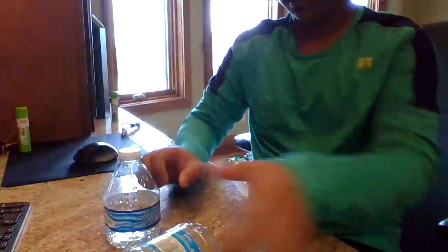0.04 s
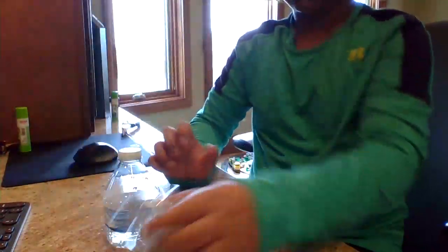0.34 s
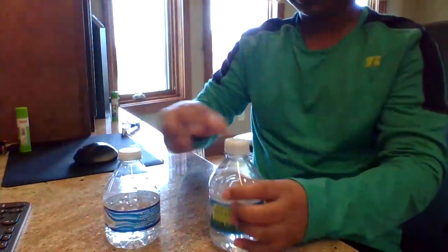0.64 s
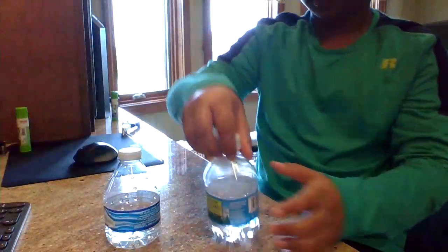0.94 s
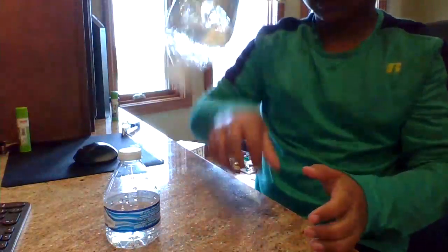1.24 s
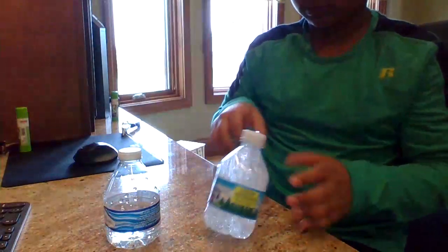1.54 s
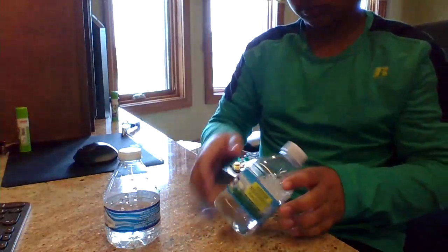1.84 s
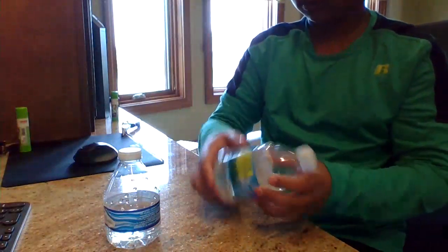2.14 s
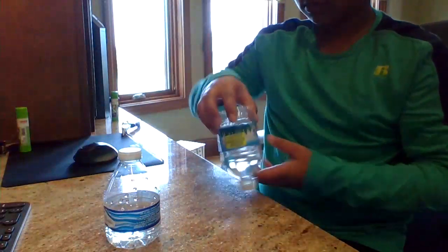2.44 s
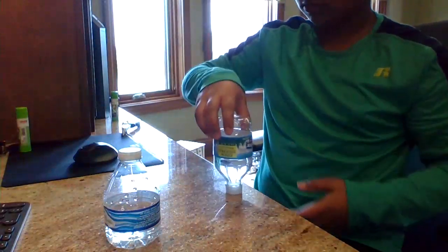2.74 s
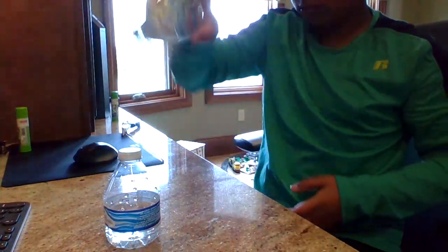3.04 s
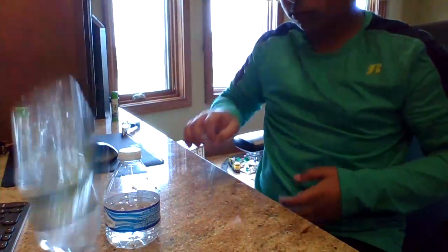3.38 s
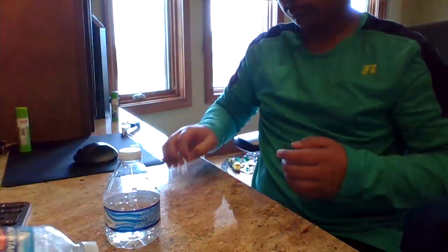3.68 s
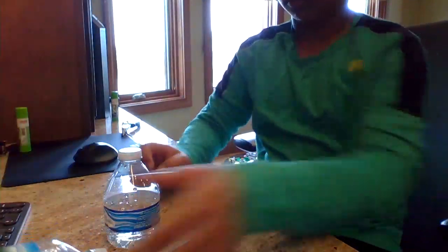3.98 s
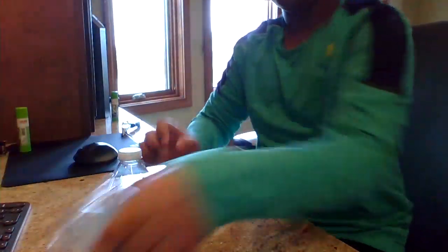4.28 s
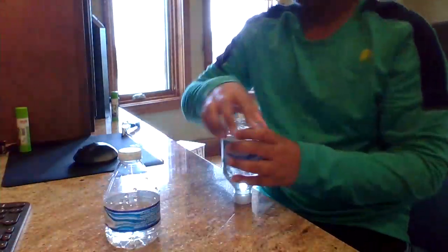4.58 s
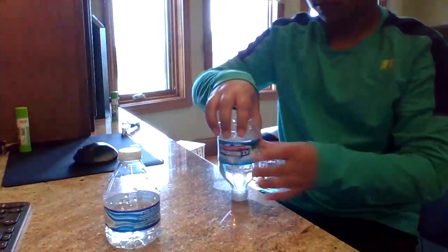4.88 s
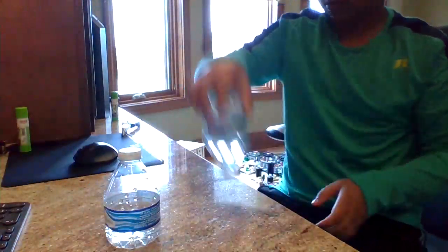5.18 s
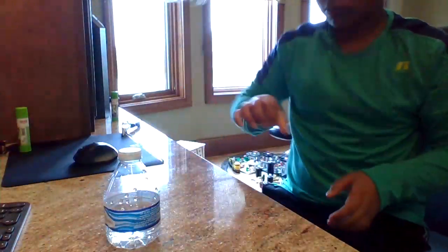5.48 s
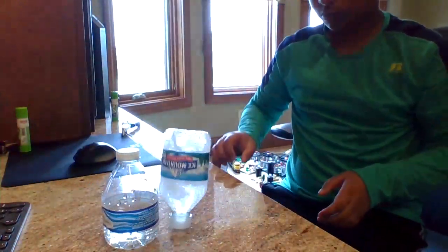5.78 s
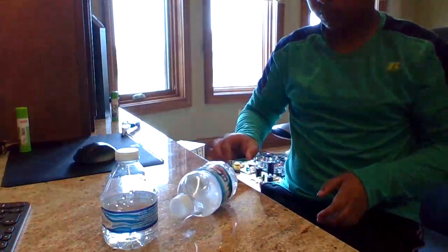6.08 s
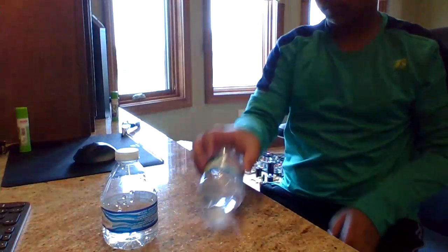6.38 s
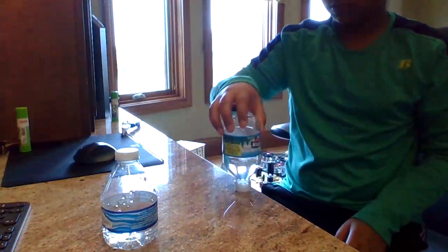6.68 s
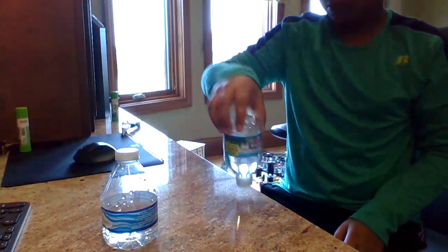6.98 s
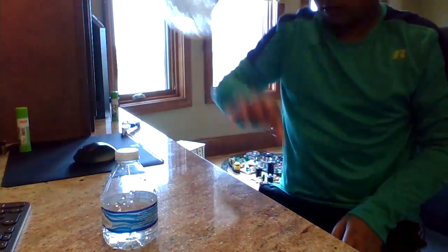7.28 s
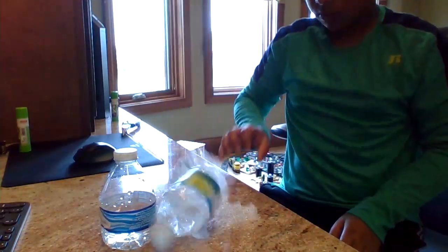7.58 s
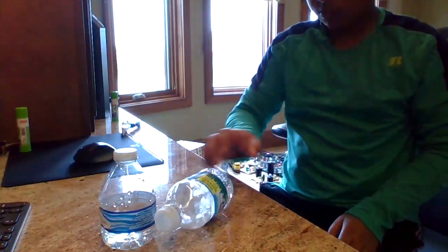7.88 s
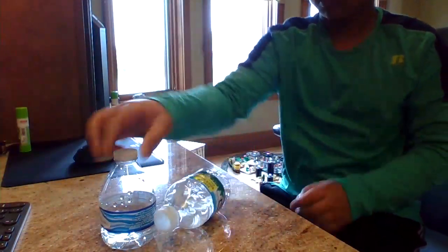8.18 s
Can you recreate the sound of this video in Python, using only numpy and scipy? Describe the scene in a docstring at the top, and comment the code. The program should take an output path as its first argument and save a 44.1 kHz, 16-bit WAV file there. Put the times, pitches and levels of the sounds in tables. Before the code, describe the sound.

Thin plastic water bottles hit a stone kitchen counter again and again, cracking and thudding, with glugs and crinkles between throws.

```python
"""Water sloshes and thin plastic crinkles as part-filled bottles are handled in a quiet, live kitchen.
Flipped, they land on a stone countertop close to the microphones. Each landing is a crack of the
buckling shell, a hollow note from the water's weight and a thud of the counter; air pockets then glug
as the water settles. The hardest landings overload the input."""
import sys
import numpy as np
from scipy import signal
from scipy.fft import rfft, irfft
from scipy.io import wavfile

SR = 44100
rng = np.random.default_rng(int(sys.argv[2]) if len(sys.argv) > 2 else 0)


def inscribe(sig):
    """Save sig as 16-bit PCM at rate SR to the path in sys.argv[1].

    A 1-D sig is mono; a 2-D sig holds one channel per row.
    Samples are clipped to [-1, 1] before scaling.
    """
    pcm = np.round(np.clip(np.atleast_2d(sig).T, -1, 1) * 32767)
    wavfile.write(sys.argv[1], SR, pcm.astype(np.int16))


N = 362943


def amp(db):
    """Decibels to gain."""
    return 10 ** (np.asarray(db) / 20)


def unit_rms(x):
    """Scales to rms 1."""
    return x / np.sqrt(np.mean(x ** 2) + 1e-20)


def lookup(rows, hz, column=1):
    """Interpolates a table column over log frequency."""
    table = np.transpose(rows)
    return np.interp(np.log(hz + 1), np.log(table[0] + 1), table[column])


def add(mix, start_s, sound):
    """Mixes a mono or stereo sound into both channels."""
    part = mix[:, max(round(start_s * SR), 0):][:, :sound.shape[-1]]
    part += sound[..., :part.shape[1]]


def colour(x, spectrum):
    """Filters x by a spectrum table, to rms 1."""
    size = x.shape[-1]
    gain = amp(lookup(spectrum, np.fft.rfftfreq(size, 1 / SR)))
    return unit_rms(irfft(rfft(x) * gain, size))


def band_noise(size, hz, octaves, order=1):
    """Noise in a resonance round hz; a higher order has steeper skirts."""
    detune = np.log2((np.fft.rfftfreq(size, 1 / SR) + 1) / hz) / octaves
    return unit_rms(irfft(rfft(rng.standard_normal(size)) / (1 + detune ** 2) ** order, size))


def swell(spread_s):
    """Gaussian envelope, 1 s long, peaking at 0.5 s."""
    return np.exp(-.5 * ((np.arange(SR) / SR - .5) / spread_s) ** 2)


# Diffuse field. Each row: frequency in Hz, correlation between the microphones.
COHERENCE = [(100, 0.68), (700, 0.79), (1400, 0.53), (2800, 0.11)]


def diffuse_noise(size):
    """Diffuse noise at two close microphones: alike in the bass."""
    common, opposed = rfft(rng.standard_normal((2, size)))
    angle = np.arccos(lookup(COHERENCE, np.fft.rfftfreq(size, 1 / SR))) / 2
    mid, side = common * np.cos(angle), opposed * np.sin(angle)
    return irfft(np.array([mid + side, mid - side]), size)


# Room hush. Each row: frequency in Hz, relative density in dB.
HUSH_SPECTRUM = [(12, -61.5), (20, -4.5), (86, 0.5), (204, -10), (480, -21), (8410, -28), (16000, -25.5)]


def room_tone(hush_db=-52, hum_db=-73, hum_hz=252):
    """A low hush and a faint steady hum."""
    hush = amp(hush_db) * colour(diffuse_noise(N), HUSH_SPECTRUM)
    return hush + amp(hum_db) * band_noise(N, hum_hz, octaves=.005)


# Narrow room resonance. Each row: frequency in Hz, impulse response level in dB, T60 in seconds.
ROOM_MODES = [(251.05, -76.5, 1.29)]


def room_resonance(x):
    """The room hums on after each blow."""
    t = np.arange(2 * SR) / SR
    response = sum(amp(db - 60 * t / t60_s) * np.sin(2 * np.pi * hz * t) for hz, db, t60_s in ROOM_MODES)
    return signal.fftconvolve(x, response)[:N]


# Kitchen reverb. Each row: frequency in Hz, level in dB, early and late T60 in seconds.
REVERB_BANDS = [(80, -13, 0.71, 2.3), (270, -16, 0.46, 1.2), (523, -6, 0.31, 1.19), (1200, -5.5, 0.38, 1.2),
                (2880, -7.5, 0.48, 0.69), (7060, -10, 0.42, 0.81), (12000, -9, 0.24, 0.3)]


def room_tail(late_db=-13, build_s=0.0031):
    """Near surfaces answer fast and densely; the rest of the room rings on more faintly."""
    hz, t, noise = signal.stft(diffuse_noise(SR), SR, nperseg=256)
    level_db, early_s, late_s = (lookup(REVERB_BANDS, hz, column)[:, None] for column in (1, 2, 3))
    fade = amp(-60 * t / early_s) + amp(late_db - 60 * t / late_s)
    fade *= amp(level_db) / np.sqrt(SR * np.mean(fade ** 2, axis=1, keepdims=True))
    tail = signal.istft(noise * fade, SR, nperseg=256)[1]
    return tail * (1 - np.exp(-(np.arange(tail.shape[1]) / SR / build_s) ** 2))


def reverb(x, paths=4, split_hz=800, rotation_hz=70):
    """Treble scatters down ever-changing paths; bass always takes the same one."""
    bass = signal.sosfiltfilt(signal.butter(2, split_hz, fs=SR, output="sos"), x)
    phase = 2 * np.pi * rotation_hz * np.arange(N) / SR
    feeds = [(x - bass) * np.maximum(np.cos(phase + 2 * np.pi * k / paths), 0) for k in range(paths)]
    feeds[0] += bass
    return sum(signal.fftconvolve(feed[None], room_tail(), axes=1)[:, :N] for feed in feeds)


def direct_path(x, aside_from_s=3.4, aside_to_s=4.4, lag_s=.0001):
    """While a bottle lies to the side, its sound reaches the left microphone later."""
    t = np.arange(N) / SR
    aside = (t > aside_from_s) & (t < aside_to_s)
    delayed = np.roll(x[0], round(lag_s * SR))
    return np.array([np.where(aside, delayed, x[0]), x[1]])


# Finger slides. Each row: peak time in seconds, spread in seconds, level in dB.
FINGER_SLIDES = [(1.19, 0.01, -42.5), (4.378, 0.024, -44.5), (7.236, 0.0095, -45)]


def scrapes():
    """Plastic slides under the fingers with a soft rasp."""
    out = np.zeros((2, N))
    for peak_s, spread_s, db in FINGER_SLIDES:
        add(out, peak_s - .5, amp(db) * swell(spread_s) * band_noise(SR, hz=2200, octaves=1))
    return out


def wall_noise(size, shared=0.2):
    """Each patch of wall radiates its own way, so the microphones share only part of the noise."""
    return np.sqrt(shared) * rng.standard_normal(size) + np.sqrt(1 - shared) * diffuse_noise(size)


# Snapping crease. Each row: frequency in Hz, relative density in dB.
SNAP_SPECTRUM = [(500, -15.5), (4000, -0.5), (10000, 3), (14500, 9)]


def snap(decay_s, size=4096):
    """A crease snaps over, sharpest as it gives way."""
    t = np.arange(size) / SR
    edge = 1 + 2 * np.exp(-t / .0005)
    return colour(wall_noise(size, shared=0.48), SNAP_SPECTRUM) * np.exp(-t / decay_s) * edge


def crinkle(decay_s=0.0032, run_s=0.019, after_db=-11):
    """One crease snaps and sets off two smaller ones."""
    out = np.zeros((2, 8192))
    add(out, 0, snap(decay_s))
    for delay_s in run_s * rng.random(2):
        add(out, delay_s, amp(after_db) * snap(decay_s / 2))
    return out


def faint_crackles(move_db=-42, stray_db=-52, per_move=7, stray_count=24):
    """The shell crackles around each slosh, plus strays at random times."""
    out = np.zeros((2, N))
    moves = [(peak_s + 2 * spread_s * offset, move_db)
             for peak_s, spread_s, *_ in slosh_events() for offset in rng.uniform(-2.1, 1, per_move)]
    strays = [(start_s, stray_db) for start_s in rng.uniform(0, N / SR, stray_count)]
    for start_s, max_db in moves + strays:
        add(out, start_s, amp(max_db - 10 * abs(rng.standard_normal())) * crinkle())
    return out


# Louder crinkles. Each row: start in seconds, level in dB.
CREASES = [(0.201, -28), (0.266, -30), (0.456, -43), (0.537, -24), (0.838, -36), (1.248, -31.5),
           (1.2617, -27), (1.279, -23), (1.291, -36), (2.067, -28), (2.333, -34), (2.387, -34.5),
           (2.718, -34), (3.756, -28), (3.807, -31.5), (4.474, -41.5), (4.746, -41), (5.252, -10),
           (5.719, -12), (6.012, -24), (6.0665, -17.5), (6.079, -23), (6.513, -40), (7.26, -21.5),
           (7.334, -25.5), (7.344, -37), (7.679, -17.5)]


def creases():
    """Creases in the wall give way, bright and unpitched."""
    out = np.zeros((2, N))
    for start_s, db in CREASES:
        add(out, start_s, amp(db) * crinkle())
    return out


# Short pitched ticks. Each row: start in seconds, centre in Hz, level in dB.
PITCHED_TICKS = [(0.266, 1100, -34.5), (0.334, 1320, -25), (0.456, 4330, -29.5), (0.655, 3240, -38),
                 (0.679, 2650, -36.5), (0.837, 3180, -42.5), (1.214, 3010, -24.5), (1.279, 1790, -29.5),
                 (1.442, 1390, -36.5), (2.116, 1100, -37), (2.511, 1810, -32), (2.934, 1660, -46),
                 (4.238, 1348, -30), (4.27, 1650, -25), (4.344, 1950, -30.5), (4.491, 4800, -25),
                 (4.657, 1910, -40), (4.802, 1210, -42.5), (4.849, 950, -42), (5.135, 4070, -35),
                 (5.204, 2410, -28.5), (6.013, 2960, -18.5), (6.4315, 2170, -29.5), (6.433, 1070, -11),
                 (7.303, 3155, -27.5), (7.371, 2800, -51), (7.66, 2760, -15.5)]


def pitched_ticks(decay_s=0.003, edge_db=-12, size=4096):
    """Plastic pops and small water plinks: one broad, damped resonance and a sharp edge."""
    out = np.zeros((2, N))
    fade = np.exp(-np.arange(size) / SR / decay_s)
    for start_s, hz, db in PITCHED_TICKS:
        resonance = unit_rms(band_noise(size, hz, octaves=.42) * fade) * np.sqrt(np.mean(fade ** 2))
        add(out, start_s, amp(db) * (resonance + amp(edge_db) * snap(decay_s / 2)))
    return out


# Spray on the wall. Each row: frequency in Hz, relative density in dB.
SPRAY_SPECTRUM = [(300, -17), (1500, 0.5), (3500, 3.5), (10000, 1.5), (15000, 2.5)]


def spray(drops_per_s=400, splat_s=.0007, wash=0.93):
    """One second of drops fizzing on the thin wall in clumps."""
    hits = rng.random(SR) < drops_per_s / SR
    drops = hits * amp(4.5 * np.minimum(rng.exponential(1, SR), 3))
    splats = signal.lfilter([1], [1, -np.exp(-1 / (splat_s * SR))], drops)
    fizz = colour((splats + wash) * wall_noise(SR), SPRAY_SPECTRUM)
    clumps = amp(3 * band_noise(SR, hz=50, octaves=.6))
    return fizz * clumps


# Swells of sloshing water, as a bottle settles or is turned.
# Each row: peak time in seconds, spread in seconds, gurgle level in dB.
WATER_SWELLS = [(0.01, 0.076, -46.5), (0.539, 0.038, -42), (0.799, 0.11, -56), (2.09, 0.029, -57),
                (2.343, 0.036, -44.5), (4.522, 0.018, -36.5), (4.719, 0.16, -52.5), (6.39, 0.037, -47.5)]


def slosh_events(swell_hz=274, swell_spray_db=-1.5, flip_hz=447, flip_db=-44.5):
    """One slosh per swell and per flip; flung water gurgles higher."""
    swells = [(peak_s, spread_s, db, db + swell_spray_db, swell_hz)
              for peak_s, spread_s, db in WATER_SWELLS]
    flung = [(start_s + WATER_LAG_S, WATER_SPREAD_S, flip_db, spray_db, flip_hz)
             for start_s, _, _, spray_db, _ in WRIST_FLICKS]
    return swells + flung


def sloshes():
    """Moving water swells into a low gurgle and a fizz of spray."""
    out = np.zeros((2, N))
    for peak_s, spread_s, gurgle_db, spray_db, gurgle_hz in slosh_events():
        fizz = amp(spray_db) * spray()
        gurgle = amp(gurgle_db) * band_noise(SR, gurgle_hz, octaves=1.7, order=2)
        slosh = swell(spread_s) * (gurgle + fizz)
        skip = max(round((.5 - peak_s) * SR), 0)
        add(out, peak_s - .5, slosh[:, skip:])
    return out


def glug(hz, db, swell_cycles=1.92, rise=0.031, size=SR):
    """An air pocket swells and dies away, its pitch rising as the water closes round it."""
    age = np.arange(size) / SR * hz / swell_cycles
    phase = 2 * np.pi * np.cumsum(hz * (1 + rise * age)) / SR
    return amp(db) * age * np.exp(1 - age) * np.sin(phase)


# Larger glugs. Each row: start in seconds, pitch in Hz, level in dB.
AIR_POCKETS = [(0.526, 336, -31.5), (0.552, 110.5, -36.5), (1.5155, 221, -5), (1.565, 215, -22.5),
               (2.304, 214, -29.5), (2.35, 237, -27.5), (2.356, 730, -26.5), (2.393, 880, -36.5),
               (2.605, 325, -22.5), (4.489, 227, -29.5), (4.524, 960, -25), (4.543, 285.5, -10),
               (4.583, 295, -15.5), (5.996, 324, -22), (7.593, 240, -24), (7.616, 255, -14),
               (7.683, 225.5, -17.5)]


def air_pockets():
    """Pockets of air ring in the moving water."""
    out = np.zeros((2, N))
    for start_s, hz, db in AIR_POCKETS:
        add(out, start_s, glug(hz, db))
    return out


# Throws. Each row: start in seconds, then rattle, crack, spray and gulp levels in dB.
WRIST_FLICKS = [(1.209, -33, -32, -59, -45), (3.117, -27, -19, -35.5, -28.5),
                (5.362, -16.5, 2.5, -32.5, -29.5), (7.256, -41, -34, -35.5, -38)]
WATER_LAG_S, WATER_SPREAD_S = 0.04, 0.034


def flips(neck_hz=390, belly_hz=225, belly_db=-38, decay_s=0.0086):
    """The flick crushes the shell and sets off a high gulp; a lower one comes as the water swings over."""
    out = np.zeros((2, N))
    for start_s, rattle_db, crack_db, _, gulp_db in WRIST_FLICKS:
        add(out, start_s, shell_crush(rattle_db, crack_db, decay_s, SNAP_SPECTRUM))
        add(out, start_s, glug(neck_hz, gulp_db, swell_cycles=4, rise=0))
        add(out, start_s + WATER_LAG_S, glug(belly_hz, belly_db, swell_cycles=4))
    return out


def droplets(centre_hz=3600, below_spray_db=3, count=10):
    """After each flip, drops plink back into the water."""
    out = np.zeros((2, N))
    for flip_s, _, _, spray_db, _ in WRIST_FLICKS:
        for jitter, pitch, faintness in rng.standard_normal((count, 3)):
            start_s = flip_s + 2 * WATER_LAG_S + WATER_SPREAD_S * jitter
            hz = centre_hz * 2 ** (pitch / 2)
            db = spray_db - below_spray_db - 10 * abs(faintness)
            add(out, start_s, glug(hz, db, swell_cycles=4, size=2048))
    return out


def churn(centre_hz=235, below_blow_db=9, max_db=-30, fade_db=-16, lag_s=0.0151, span_s=0.096, count=18):
    """After each knock the water churns to rest in a crowd of glugs that fade and fall in pitch."""
    out = np.zeros((2, N))
    for start_s, blow_db, *_ in BOTTLE_KNOCKS:
        for k, (jitter, pitch) in enumerate(rng.random((count, 2))):
            progress = (k + jitter) / count
            hz = centre_hz * 2 ** (2 * (pitch - .5) - progress / 2)
            db = min(blow_db - below_blow_db, max_db) + fade_db * progress
            add(out, start_s + lag_s + span_s * progress, glug(hz, db, rise=0, size=8192))
    return out


# Knocks that set the bottle ringing. Each row: start in seconds, centre in Hz, level in dB.
RINGING_KNOCKS = [(3.467, 560.2, -6), (5.7075, 553, -6), (6.432, 1152, -22.5)]


def bottle_rings(t60_s=0.32, octaves=0.23, count=9):
    """The bottle rings in a cluster of uneven modes, strongest in the middle, that beat as they fade."""
    out = np.zeros((2, N))
    t = np.arange(SR) / SR
    for start_s, centre_hz, db in RINGING_KNOCKS:
        cluster = np.zeros(SR)
        for offset in 2 * (np.arange(count) + rng.random(count)) / count - 1:
            hz = centre_hz * 2 ** (octaves * offset)
            cluster += (1 - abs(offset) / 2) * np.sin(2 * np.pi * (hz * t + rng.random()))
        add(out, start_s, amp(db - 60 * t / t60_s) * cluster / np.sqrt(count))
    return out


# Counter and surroundings. Each row: mode frequency in Hz, relative level in dB, T60 in seconds.
COUNTER_MODES = [(78.5, -11, 0.24), (102.8, -5, 0.36), (141.7, -15.5, 0.74), (227, -0.5, 0.11),
                 (244.4, -5, 0.12), (313, -8, 0.37), (347.6, -3, 0.34), (423, -12, 0.4), (485.6, -12, 0.35),
                 (553, -9.5, 0.18), (886, -16.5, 0.11)]


def counter_thud(db, tilt_db_per_octave, contact_s=0.00035, damping=0.76, settle_s=0.04):
    """The counter rings; the settling water soaks up part of the ring."""
    t = np.arange(SR) / SR
    ring = np.zeros(SR)
    for k, (hz, mode_db, t60_s) in enumerate(COUNTER_MODES):
        fade = amp(mode_db + tilt_db_per_octave * np.log2(hz / 240) - 60 * t / t60_s)
        ring += (-1) ** k * fade * np.sin(2 * np.pi * hz * t)
    attack = 1 - np.exp(-t / contact_s)
    settling = 1 + damping * (2 * np.exp(-t / settle_s) - 1)
    return amp(db) * ring * attack * settling


# Shell rattle. Each row: frequency in Hz, relative density in dB.
RATTLE_SPECTRUM = [(100, -7), (300, -5.5), (800, 1), (2500, -8), (5000, -14), (9000, -25.5)]


def shell_crush(rattle_db, crack_db, decay_s, crack_spectrum, size=16384):
    """Thin plastic crushes in a quick run of buckles: a rattle and a shorter, brighter crack."""
    t = np.arange(size) / SR
    buckles = unit_rms(amp(4.5 * band_noise(size, hz=220, octaves=.7)))
    rattle = colour(wall_noise(size), RATTLE_SPECTRUM) * np.exp(-t / decay_s)
    crack = colour(wall_noise(size), crack_spectrum) * np.exp(-t / (0.81 * decay_s))
    attack = 1 - np.exp(-t / (0.15 * decay_s))
    return (amp(rattle_db) * rattle + amp(crack_db) * crack) * buckles * attack


# Crack of a knock. Each row: frequency in Hz, relative density in dB.
CRACK_SPECTRUM = [(300, -36.5), (2000, -11), (5000, -1), (9000, -2.5), (14000, -2.5)]
# Response to a blow's weight. Each row: blow in dB, thud tilt in dB per octave, rattle decay in seconds.
BLOW_RESPONSE = [(-29, 0.5, 0.0082), (-14.5, -6, 0.014), (-4.5, 3, 0.014)]
# Bottle knocks: landings, and one hollow pop as it is picked up.
# Each row: start in seconds, blow in dB, note in Hz, rattle in dB, crack in dB.
BOTTLE_KNOCKS = [(0.864, -49, 98.5, -38.5, -57), (1.507, -16, 214, -1.5, 1.5),
                 (2.5942, -18.5, 344.4, -25, -27), (3.468, -7.5, 212.5, -2.5, 4),
                 (3.657, -28, 215, -16.5, -24), (3.667, -33.5, 236, -19.5, -8.5),
                 (4.543, -21, 300, -23, -29.5), (5.7066, -6, 206.6, 1.5, 2.5),
                 (5.993, -25.5, 349, -12, -19), (6.0676, -42, 341.4, -18.5, -22.5),
                 (6.432, -29.5, 444, -21, -42), (6.645, -27.5, 112.2, -30.5, -38),
                 (7.576, -5.5, 228.7, 1, -1), (7.661, -24, 220, -15, -31)]


def knocks(note_over_blow_db=4, tick_below_crack_db=7):
    """Each knock is a thud, a swelling hollow note, and a crush and tick of the wall."""
    out = np.zeros((2, N))
    blows_db, tilts, decays_s = np.transpose(BLOW_RESPONSE)
    for start_s, blow_db, note_hz, rattle_db, crack_db in BOTTLE_KNOCKS:
        tilt = np.interp(blow_db, blows_db, tilts)
        decay_s = np.interp(blow_db, blows_db, decays_s)
        add(out, start_s, counter_thud(blow_db, tilt))
        add(out, start_s, -glug(note_hz, blow_db + note_over_blow_db, swell_cycles=1.65))
        add(out, start_s, shell_crush(rattle_db, crack_db, decay_s, CRACK_SPECTRUM))
        add(out, start_s, amp(crack_db - tick_below_crack_db) * snap(decay_s=0.0038))
    return out


def scene(balance_db=0.3):
    """Bottles in the kitchen, over the room tone."""
    impacts = knocks() + bottle_rings() + flips()
    water = sloshes() + air_pockets() + churn() + droplets()
    small_sounds = pitched_ticks() + creases() + faint_crackles() + scrapes()
    bottles = impacts + water + small_sounds
    background = room_tone()
    mono = bottles.mean(0)
    in_room = direct_path(bottles) + reverb(mono) + room_resonance(mono)
    return background + in_room * amp([[-balance_db], [balance_db]])


def record(dry, knee=5, cutoff_hz=16100):
    """Input overload on the hardest landings, then a low-pass."""
    clipped = dry / (1 + abs(dry) ** knee) ** (1 / knee)
    lowpass = signal.firwin(511, cutoff_hz, window=("kaiser", 8), fs=SR)
    return signal.oaconvolve(clipped, lowpass[None], "same")


dry = scene()
out = record(dry)
inscribe(out)
```